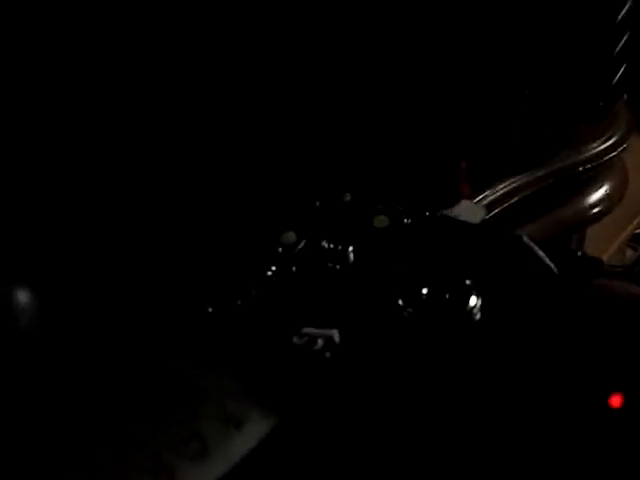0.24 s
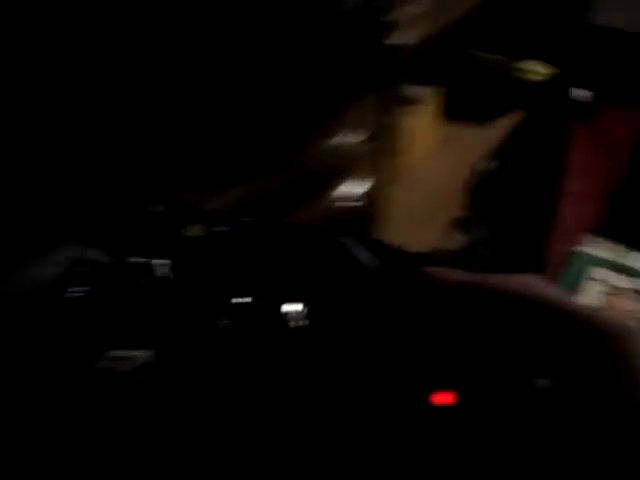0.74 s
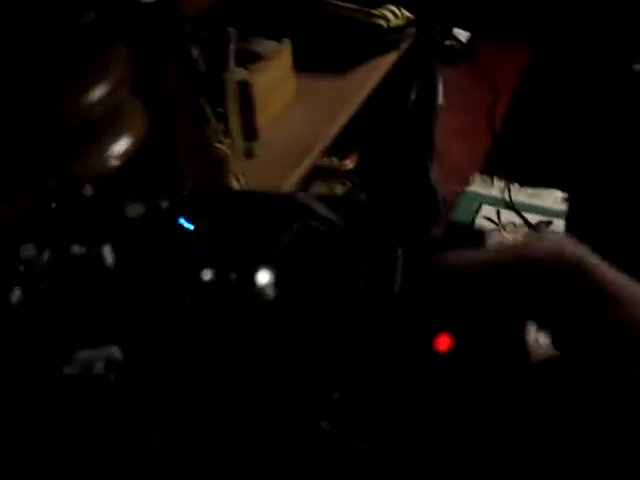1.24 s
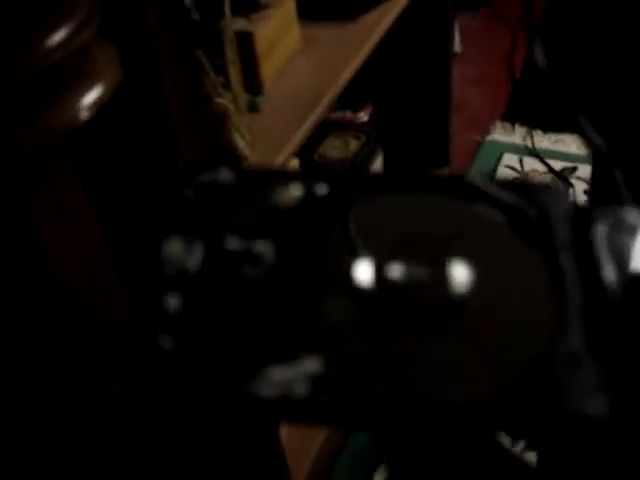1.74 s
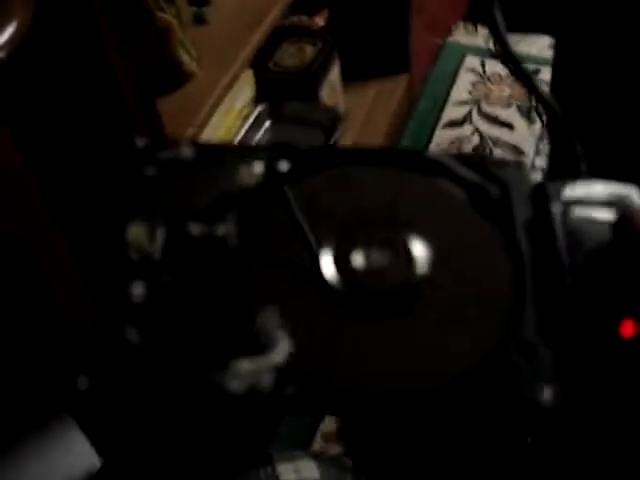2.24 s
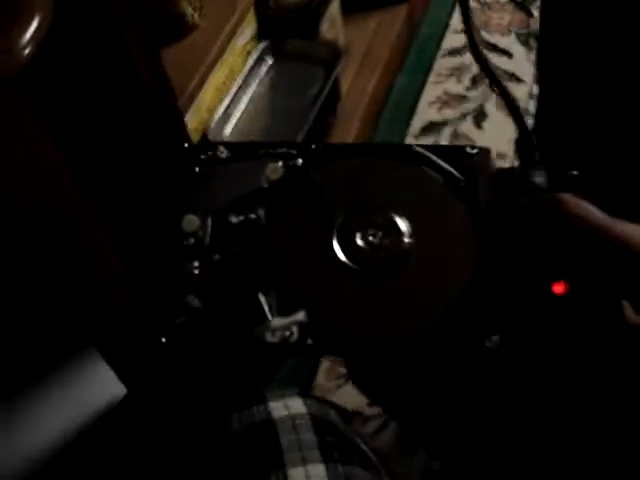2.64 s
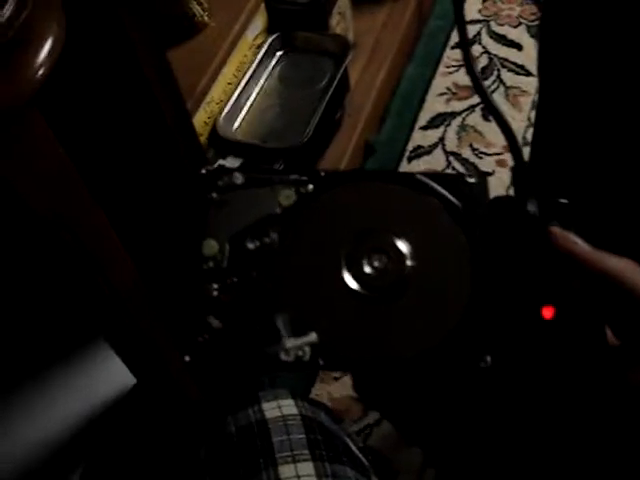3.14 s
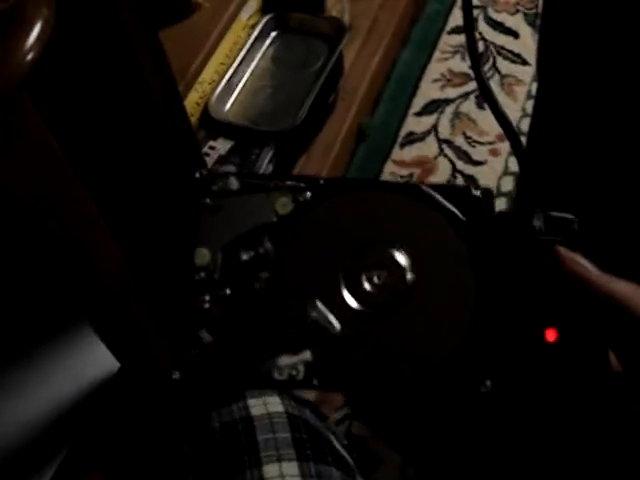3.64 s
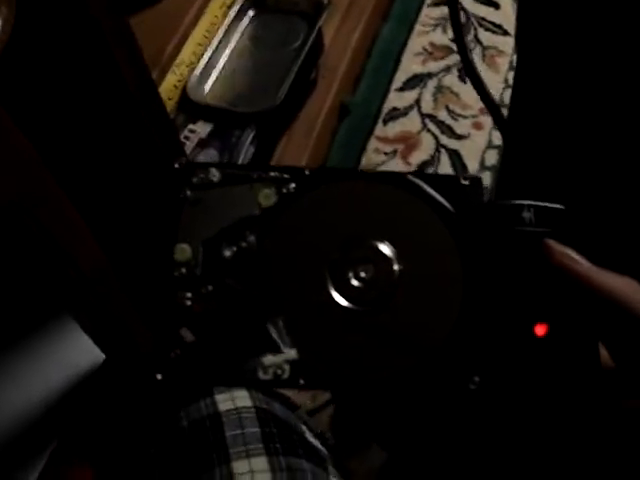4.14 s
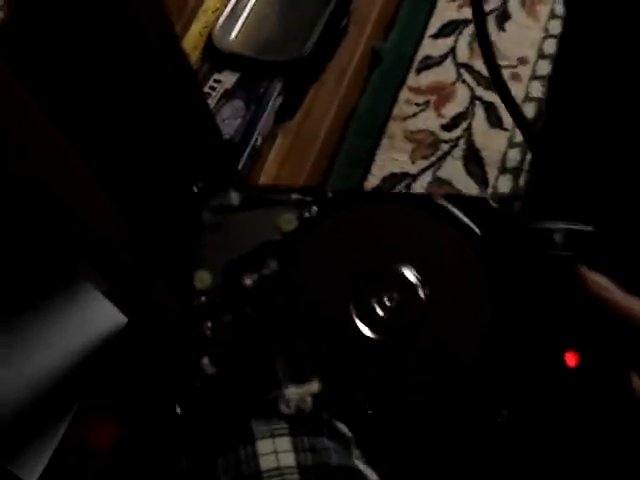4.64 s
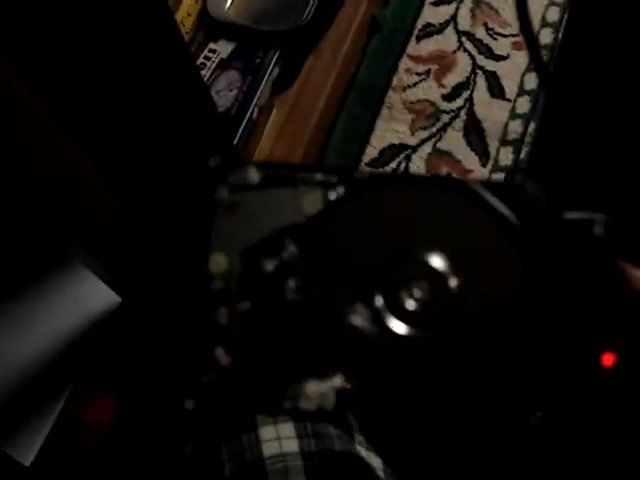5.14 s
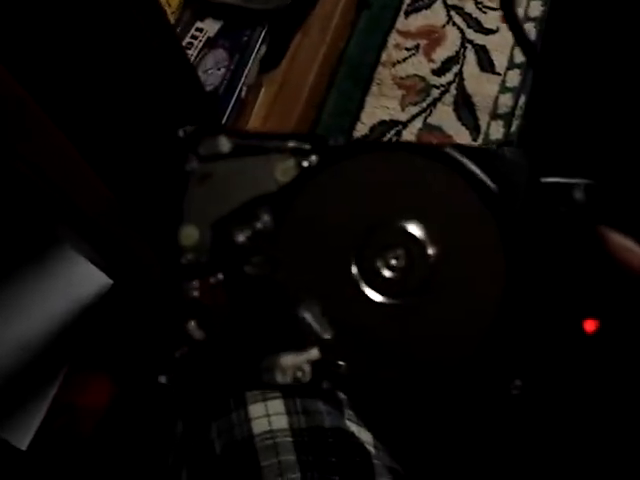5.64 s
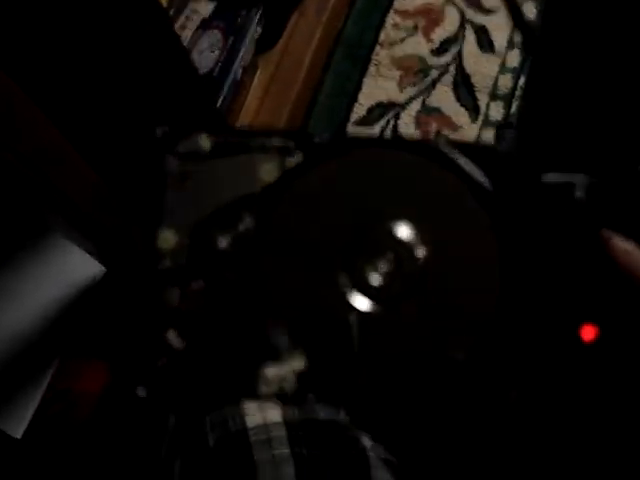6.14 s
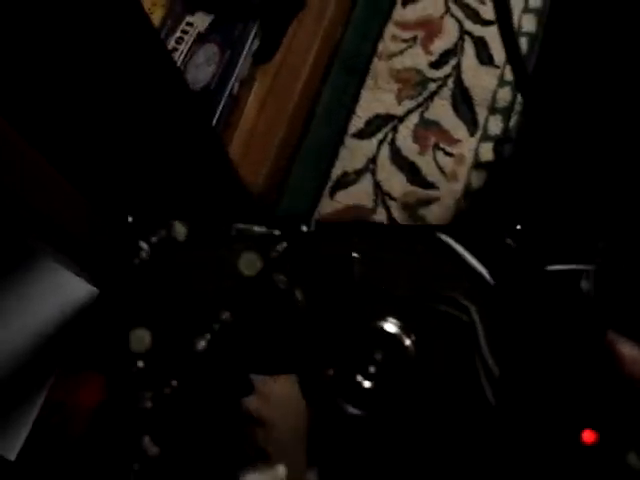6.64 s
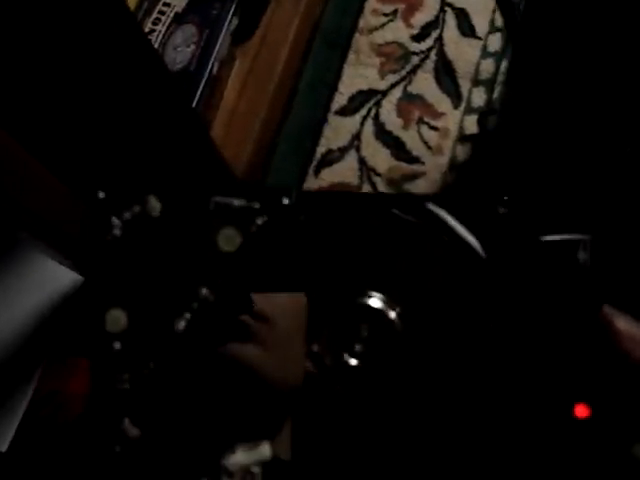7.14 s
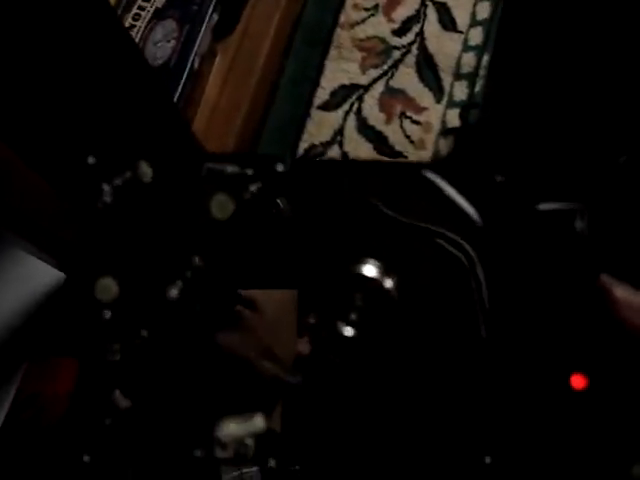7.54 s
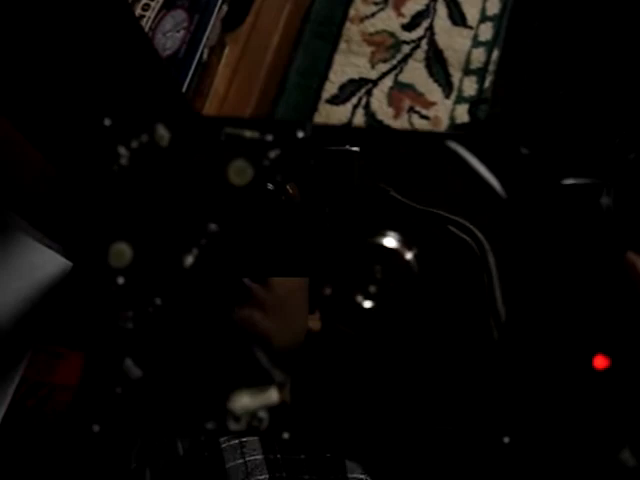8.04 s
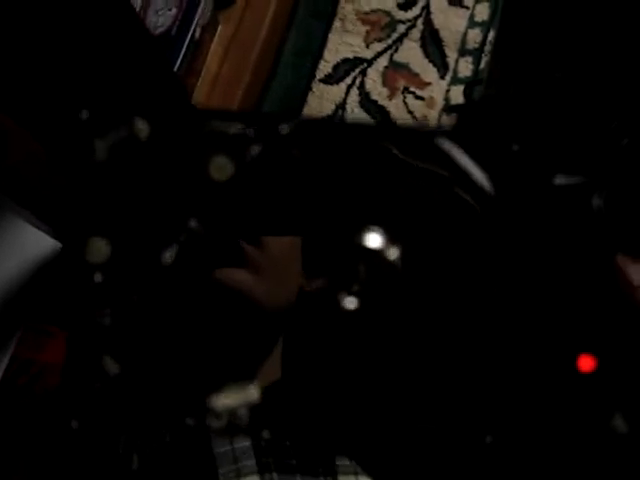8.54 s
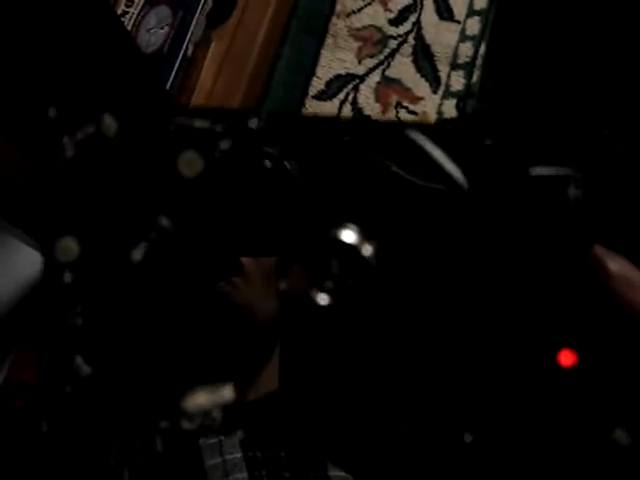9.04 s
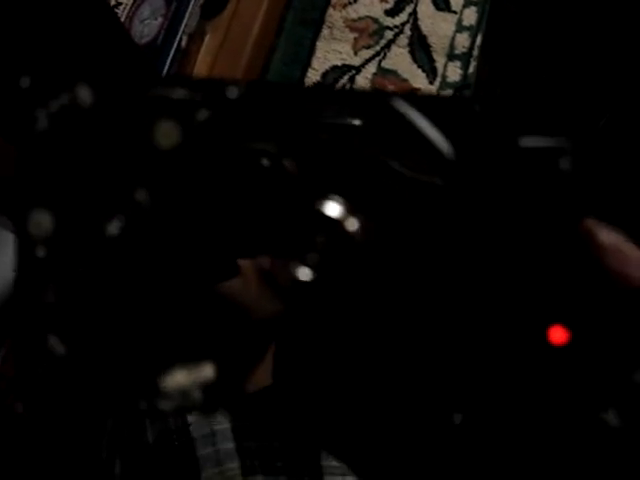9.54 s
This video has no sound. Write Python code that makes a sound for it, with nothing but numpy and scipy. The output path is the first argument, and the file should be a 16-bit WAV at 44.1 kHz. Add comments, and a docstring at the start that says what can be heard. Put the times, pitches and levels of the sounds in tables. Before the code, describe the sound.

An opened, failing hard drive knocks, ticks and loudly clacks in a repeating cycle over a steady fan rush and faint whine.

```python
"""An opened, failing hard drive, close to a small camera's microphone.
From the start a fan rushes, the spindle whines thinly and fingers rub the housing. About every 1.3 s
the drive retries: a double knock in the case, then the head arm ticks, chatters or scrapes over the
platter, and at last slams into its stop with a triple clack.
The camera's gain control ducks at each clack and creeps back as the next retry begins."""
import sys
import numpy as np
from scipy import signal
from scipy.fft import rfft, irfft, next_fast_len
from scipy.io import wavfile
from scipy.ndimage import uniform_filter1d, map_coordinates

SR = 44100
rng = np.random.default_rng(int(sys.argv[2]) if len(sys.argv) > 2 else 0)


def store_pcm(level_fs):
    """Save levels as 16-bit WAV."""
    pcm = np.round(np.clip(level_fs, -1, 1) * 32767).astype(np.int16)
    wavfile.write(sys.argv[1], SR, np.atleast_2d(pcm).T)


N = 431298
TIME = np.arange(N) / SR
SHORT = TIME[:SR // 5]  # the 0.2 s span of one short sound


def amp(db):
    """Decibels to amplitude."""
    return 10 ** (np.asarray(db) / 20)


def unit(x):
    """x scaled to rms 1."""
    return x / np.sqrt(np.mean(x ** 2) + 1e-20)


def curve(rows):
    """(s, value) rows joined by straight lines."""
    return np.interp(TIME, *np.transpose(rows))


def wobble(rate):
    """A smooth random curve, rate knots a second."""
    return map_coordinates(rng.standard_normal(int(N * rate / SR) + 4), [TIME * rate])


def filtered(x, response):
    """x times a complex response of frequency."""
    size = next_fast_len(len(x) + SR // 5)
    return irfft(rfft(x, size) * response(np.fft.rfftfreq(size, 1 / SR)), size)[:len(x)]


def coloured(points):
    """Noise of rms 1 with a (Hz, dB) spectrum."""
    freqs, db = np.transpose(points)
    white = rng.standard_normal(N)
    return unit(filtered(white, lambda hz: amp(np.interp(np.log(hz + 1), np.log(freqs + 1), db))))


def tone(hz, drift):
    """A sine of rms 1 whose pitch drifts by a share of itself."""
    cycles = np.cumsum(hz * (1 + drift)) / SR + rng.random()
    return np.sqrt(2) * np.sin(2 * np.pi * cycles)


def loudness(x, size):
    """Running rms over size samples."""
    return np.sqrt(np.abs(uniform_filter1d(x ** 2, size)) + 1e-12)


def add(track, start, sound):
    """Mix a sound into a track at start seconds."""
    part = track[max(round(start * SR), 0):][:len(sound)]
    part += sound[:len(part)]


def ring(force, modes):
    """A force sets a body's resonances ringing, in alternating polarity."""
    def response(f):
        return sum((-1) ** k * amp(db) * 1j * f * width / (hz * hz - f * f + 1j * f * width)
                   for k, (hz, width, db) in enumerate(modes))
    return filtered(force, response)


def with_bend(modes, bend_db, bend_hz=3628, width_hz=75):
    """A body's resonances together with the arm's main bending mode."""
    return [*modes, (bend_hz, width_hz, bend_db)]


def contact(t60, snap, lead, cling=1.52):
    """One contact's force: a run-up of lead s, an impulse of size snap, a buzz that dies in t60 s."""
    t = SHORT - lead
    buzz_db = -60 * (np.abs(t) / max(t60, 0.002)) ** cling
    force = rng.standard_normal(len(t)) * amp(np.where(t < 0, 20 * t / lead, buzz_db))
    force[round(lead * SR)] += snap
    return force


def blow(force, modes, db, vary_db=1.5):
    """A struck body, db loud in its strongest 4 ms; no two blows share out the modes alike."""
    varied = [(hz, width, level + vary_db * rng.standard_normal()) for hz, width, level in modes]
    sound = ring(force, varied)
    return amp(db) * sound / loudness(sound, size=176).max()


def blows(rows, modes, gain_db, t60, snap, lead):
    """A series of (s, dB) pulses through one set of resonances."""
    track = np.zeros(N)
    for start, db in rows:
        add(track, start - lead, blow(contact(t60, snap, lead), modes, db + gain_db))
    return track


# The fan's rush at the microphone. Each row: frequency in Hz, relative level in dB.
AIR_SPECTRUM = [(35, -44.5), (60, -27.5), (81, -13), (122, -16), (161, -7), (593, -7), (646, -7), (970, -2),
                (1060, -8), (1150, -7.5), (1310, -8), (3580, -19.5), (7100, -32), (7730, -21),
                (10000, -59.5), (13000, -74), (22000, -120)]
# Resonances of its air path. Each row: frequency in Hz, width in Hz, relative level in dB.
DUCT_MODES = [(300.6, 2.7, 0), (641.5, 27, -1.5), (942, 51, -13)]
# Blade tones; the close pair beats. Each row: frequency in Hz, level in dB.
BLADE_TONES = [(1126, -55.5), (1118, -65.5), (1638, -63)]
# Hum and whine swell as the camera moves into their beam. Each row: time in seconds, relative gain in dB.
BEAM_SWELL = [(0, -0.5), (4.5, 12), (7.5, 7.5), (9.78, 7)]


def fan(air_db=-46, hum_hz=1253):
    """Behind everything, air rushes through a duct, with blade tones, a hum and a faint deep rumble."""
    drift = 0.00042 * wobble(2.75)
    air = amp(air_db + 0.63 * wobble(10)) * coloured(AIR_SPECTRUM)
    duct = amp(-55.5) * unit(ring(rng.standard_normal(N), DUCT_MODES))
    blades = sum(amp(db + wobble(7.5)) * tone(hz, drift) for hz, db in BLADE_TONES)
    hum = amp(curve(BEAM_SWELL) - 69.5) * tone(hum_hz, drift)
    rumble = amp(-59) * coloured([(5, -1), (20, -9), (32, -7), (45, -17.5), (100, -52.5)])
    return air + duct + blades + hum + rumble


# The spindle motor, faint even this close. Each row: frequency in Hz, level in dB before the swell.
WHINE_TONES = [(2526, -79.5), (5053, -80), (5125, -85), (7580, -74.5), (9265, -87.5)]


def spindle(beam_share=0.79, flutter_db=2.2):
    """The motor's thin whine flutters with its speed control."""
    drift = 0.00103 * wobble(60)
    whine = sum(amp(db + flutter_db * wobble(27)) * tone(hz, drift) for hz, db in WHINE_TONES)
    return amp(beam_share * curve(BEAM_SWELL)) * whine


# The hand shifts its grip. Each row: start in seconds, end in seconds, level in dB.
GRIP_SHIFTS = [(0, 1.297, -57.5), (4.7, 5.25, -56.5)]


def grip(rest_db=-70, fade_s=0.27):
    """How hard the hand rubs: faintly at rest, more during each shift."""
    shifts = sum(amp(db) * np.interp(TIME, [start - fade_s, start, end, end + fade_s], [0, 1, 1, 0])
                 for start, end, db in GRIP_SHIFTS)
    return amp(rest_db) + shifts


# The plastic housing. Each row: resonance in Hz, width in Hz, relative level in dB.
HOUSING_MODES = [(434, 200, -1.5), (993, 36, 2), (1300, 280, -4), (2480, 610, -4.5), (4030, 3900, -15)]
# Taps and creaks near the microphone. Each row: start in seconds, level in dB, centre of colour in Hz.
FINGER_TAPS = [(0.568, -34, 2040), (1.703, -37, 2940), (1.894, -29, 1360), (2.236, -39, 2700),
               (4.655, -28, 490), (4.666, -30, 563), (5.538, -43, 2500)]


def handling(width_octaves=0.98):
    """The hand rubs softly on the plastic housing, with dull taps and small creaks."""
    rub_spectrum = [(70, -44), (160, 1.5), (350, -0.5), (900, -8.5), (4000, -45.5)]
    track = grip() * amp(0.55 * wobble(14)) * coloured(rub_spectrum)
    for start, db, centre_hz in FINGER_TAPS:
        tap = contact(t60=0.048, snap=17.4, lead=0.0019)
        force = filtered(tap, lambda hz: np.exp(-0.5 * (np.log2((hz + 1) / centre_hz) / width_octaves) ** 2))
        add(track, start, blow(force, HOUSING_MODES, db))
    return track


# The low colour of a thump. Each row: resonance in Hz, width in Hz, relative level in dB.
THUMP_MODES = [(80, 33, 0)]
# Soft low thumps. Each row: time in seconds, relative level in dB.
LOW_THUMPS = [(1.028, -41), (1.280, -28.5), (2.342, -40.5)]


def low_thumps(cutoff_hz=250):
    """Soft low thumps at the loudest chatter and the first slam."""
    thumps = blows(LOW_THUMPS, THUMP_MODES, gain_db=-5.5, t60=0.038, snap=11, lead=0.0028)
    return filtered(thumps, lambda hz: 1 / (1 + 1j * hz / cutoff_hz))


# The hiss off the open platter. Each row: frequency in Hz, relative level in dB.
SCRAPE_SPECTRUM = [(1180, -39), (2000, -22), (2690, -6), (3380, -29), (3640, -3.5), (4220, -26), (4860, -3),
                   (5950, -4.5), (6540, -3), (7440, -15), (7900, -4), (9220, -4), (10000, -19),
                   (13000, -41), (22000, -120)]
# The heads touch down, mostly pressing harder as they go.
# Each row: start in seconds, length in seconds, final level in dB, swell in dB, squeal in Hz.
HEAD_RUBS = [(2.492, 0.031, -49, -1, 9550), (4.98, 0.079, -32.5, 12.5, 4950), (6.293, 0.042, -43, 2, 4760),
             (7.541, 0.085, -32, 14, 6500), (8.765, 0.08, -34, 5, 6500)]


def scrape(grain_db=2, squeal_gain=0.72, squeal_width_hz=300):
    """A short grainy hiss of the heads on the platter, with a rough squeal and some ring of the arm."""
    grain = amp(grain_db * wobble(663))[:len(SHORT)]
    hiss = coloured(SCRAPE_SPECTRUM)
    track = np.zeros(N)
    for start, length, db, swell_db, squeal_hz in HEAD_RUBS:
        modes = with_bend([(squeal_hz, squeal_width_hz, 0)], bend_db=-5)
        squeal = unit(ring(rng.standard_normal(len(SHORT)), modes))
        pressure = (SHORT < length) * amp(db + swell_db * (SHORT / length - 1))
        rubbing = unit(grain * (hiss[round(start * SR):][:len(SHORT)] + squeal_gain * squeal))
        add(track, start, rubbing * uniform_filter1d(pressure, size=260, mode="constant"))
    return track


# The head arm, bare to the microphone. Each row: resonance in Hz, width in Hz, relative level in dB.
ARM_MODES = [(2210, 100, -11), (2730, 110, 5.5), (3890, 160, 3), (4300, 280, 2), (4790, 166, 7),
             (5480, 550, -6), (6700, 420, -5.5), (7720, 306, 1.5), (9760, 320, -10.5)]
# The arm hunts for a track; some hunts stop short of their crest. Each row: start in seconds,
# length in seconds, time to the crest in seconds, crest level in dB, bending mode in dB.
TRACK_HUNTS = [(.795, 0.016, 0.012, -23.5, 18), (0.866, 0.046, 0.059, -22, 12.5),
               (0.996, .057, 0.052, -21.5, 14), (2.332, .05, 0.02, -19.5, 12.5),
               (3.615, 0.089, 0.073, -26.5, 8), (6.345, 0.011, 0.0058, -24, 10.5)]


def chatter(kicks_per_s=150, scatter=0.67, fade_db=14, swell_db=7.5, ease_db=11.5):
    """The servo kicks the arm to and fro at an uneven rate; each kick fades before the next."""
    pace = kicks_per_s * np.exp(scatter * wobble(90))
    track = np.zeros(N)
    for start, length, crest, db, bend_db in TRACK_HUNTS:
        kicks = np.cumsum(pace[round(start * SR):][:len(SHORT)]) / SR
        force = amp(-fade_db * (kicks % 1)) * rng.standard_normal(len(SHORT))
        modes = with_bend(ARM_MODES, bend_db)
        below_crest_db = np.interp(SHORT, [0, crest, length], [swell_db, 0, ease_db])
        effort = (SHORT < length) * amp(db - below_crest_db)
        add(track, start, ring(force * effort, modes) / np.std(ring(force, modes)))
    return track


# The open case from close by. Each row: resonance in Hz, width in Hz, relative level in dB.
CASE_MODES = [(297, 450, -47), (1045, 200, -19.5), (1798, 31.7, -1.5), (1922, 30, -2), (2134, 39, -7.5),
              (2369, 42.5, 2.5), (2510, 126, -4), (2882, 37, -4), (3740, 220, -3.5), (4360, 45, -10),
              (4670, 9.8, -10), (4603, 230, -0.5), (5290, 460, -5), (5640, 162, -1), (5930, 320, -3.5),
              (6550, 560, -8.5), (7420, 710, -16), (9500, 1700, -14), (9960, 270, -19)]
# The hard edge of the lighter knocks. One row: resonance in Hz, width in Hz, relative level in dB.
KNOCK_EDGE = (4860, 170, -9.5)
# Pairs of knocks. Each row: middle of the pair in seconds, gap in seconds, relative level in dB.
RETRY_KNOCKS = [(0.326, 0.01, -32), (1.8522, .011, -31), (3.163, 0.011, -33), (4.460, .015, -36),
                (5.814, .016, -35.5), (7.053, 0.027, -34.5), (8.291, 0.013, -31), (9.515, 0.014, -32)]


def knocks():
    """Each retry opens with a double knock in the case, the first lighter and shorter."""
    case = with_bend([*CASE_MODES, KNOCK_EDGE], bend_db=-23.5)
    first = [(middle - gap / 2, db) for middle, gap, db in RETRY_KNOCKS]
    second = [(middle + gap / 2, db) for middle, gap, db in RETRY_KNOCKS]
    return (blows(first, case, gain_db=3.5, t60=0.013, snap=5.3, lead=0.003)
            + blows(second, case, gain_db=7.5, t60=0.029, snap=1.5, lead=0.003))


# Two steps follow each double knock. Each row: delay in seconds, level offset in dB.
ARM_STEPS = [(0.1054, -6.5), (0.1843, -7.5)]
# Stray jerks while the arm searches. Each row: time in seconds, relative level in dB.
ARM_JERKS = [(1.115, -35.5), (2.319, -33.5), (2.438, -41.5), (3.736, -41.5), (5.097, -42.5), (6.323, -34),
             (6.412, -37), (7.656, -35), (7.697, -38.5), (8.878, -30.5), (8.918, -38.5)]
# The dry, broad edge of a tick. One row: resonance in Hz, width in Hz, relative level in dB.
TICK_EDGE = (5000, 1800, -10)


def ticks():
    """Small steps and jerks snap and ring only the arm."""
    steps = [(middle + delay, db + step_db)
             for middle, _, db in RETRY_KNOCKS for delay, step_db in ARM_STEPS]
    arm = with_bend([*ARM_MODES, TICK_EDGE], bend_db=-2.5)
    return blows(steps + ARM_JERKS, arm, gain_db=5, t60=0.016, snap=5.2, lead=0.0022)


# The dull knock of the whole drive. Each row: resonance in Hz, width in Hz, relative level in dB.
FRAME_MODES = [(110, 240, 4), (450, 330, 8), (1060, 100, -2)]
# The contacts of one slam; the first two merge into one clack. Each row: delay in seconds,
# level offset in dB, run-up in seconds, buzz t60 in seconds, bending mode in dB.
SLAM_CONTACTS = [(0, -1.5, .003, 0.011, 7.5), (.006, 0, .003, 0.012, 6.5), (0.0433, 1, .007, .037, 6),
                 (0.061, 0.5, .003, 0.031, 0)]
# The slams that end the retries, loudest at the microphone. Each row: time in seconds, base level in dB.
ARM_SLAMS = [(1.2788, -15), (2.589, -15), (3.8864, -16.5), (5.239, -16.5), (6.479, -16.5), (7.717, -15.5),
             (8.941, -15)]


def slams(frame_db=-23):
    """The arm hits its stop and knocks the frame, springs back and hits twice more, ringing the case."""
    track = np.zeros(N)
    for start, db in ARM_SLAMS:
        impact = contact(t60=0.007, snap=5.4, lead=0.0012)
        add(track, start, blow(impact, FRAME_MODES, db + frame_db))
        for delay, contact_db, lead, t60, bend_db in SLAM_CONTACTS:
            force = contact(t60, snap=5.1, lead=lead)
            clack = blow(force, with_bend(CASE_MODES, bend_db), db + contact_db)
            add(track, start + delay - lead, clack)
    return track


def scene():
    """Arm, hand, fan and motor, all close to one microphone, with a few soft low thumps."""
    arm = slams() + knocks() + ticks() + chatter() + scrape()
    return (arm + low_thumps() + handling() + fan() + spindle())[None]


def gain_control(x, limit_db=-21, recovery_db_per_s=6.5, thump_gain=0.0071, rise_s=0.0022, fall_s=0.02):
    """Loud sounds pull the gain down at once and it creeps back; each sudden drop leaks a low thump."""
    excess_db = np.maximum(20 * np.log10(loudness(x, size=220)) - limit_db, 0)
    recovery_db = recovery_db_per_s * TIME
    cut_db = np.maximum.accumulate(excess_db + recovery_db) - recovery_db
    drops = np.maximum(np.diff(cut_db, prepend=cut_db[0]), 0)
    thumps = signal.fftconvolve(drops, np.exp(-SHORT / fall_s) - np.exp(-SHORT / rise_s))[:N]
    return x * amp(-cut_db) + thump_gain * thumps


def record(dry, top_hz=10080):
    """The camera rides its gain, adds its own faint hiss and keeps nothing above its band limit."""
    taken = gain_control(dry[0]) + amp(-57) * rng.standard_normal(N)
    return filtered(taken, lambda hz: 1 / np.sqrt(1 + (hz / top_hz) ** 400))[None]


dry = scene()
out = record(dry)
store_pcm(out)
```